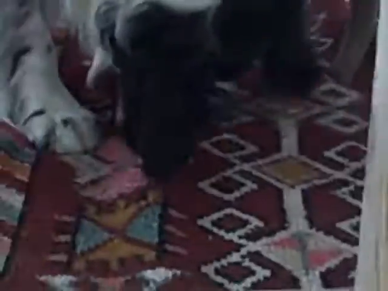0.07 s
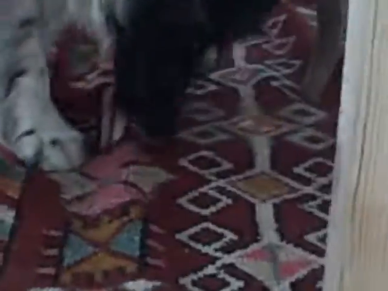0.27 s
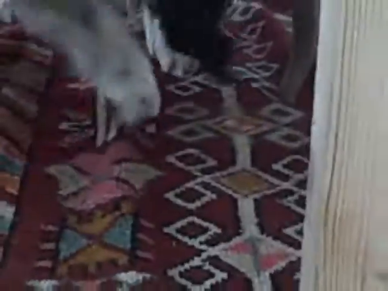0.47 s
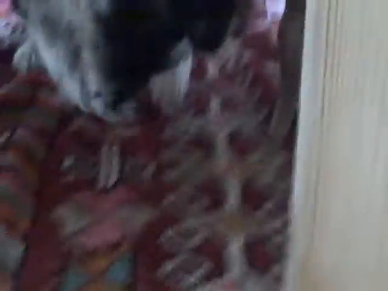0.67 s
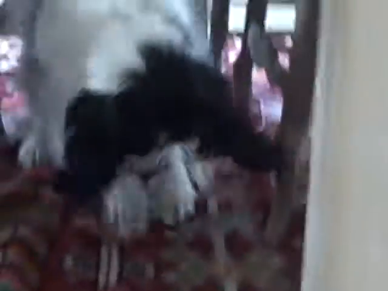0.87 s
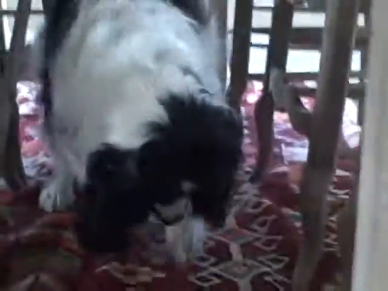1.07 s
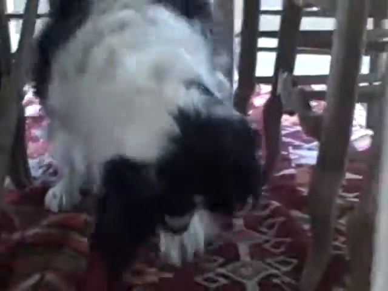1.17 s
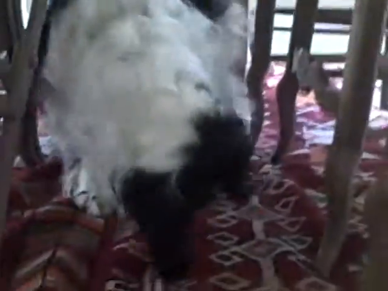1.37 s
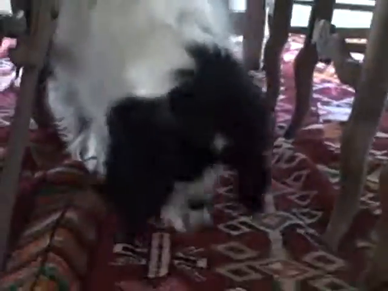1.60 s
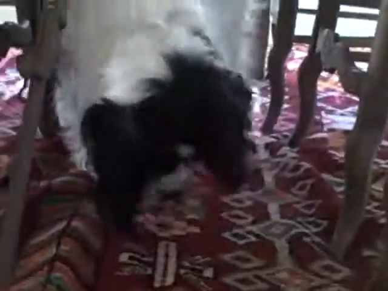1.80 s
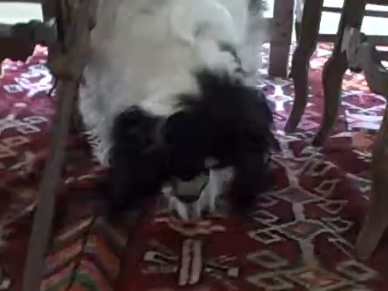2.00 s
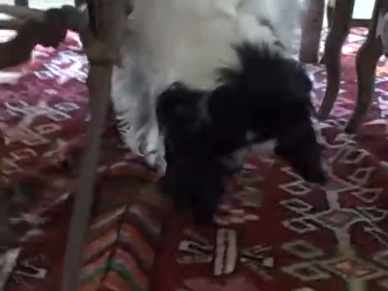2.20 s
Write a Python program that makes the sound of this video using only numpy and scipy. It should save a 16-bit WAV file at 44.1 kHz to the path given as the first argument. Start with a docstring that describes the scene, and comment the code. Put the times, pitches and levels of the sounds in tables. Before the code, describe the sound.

A puppy digs at a woven rug on a wooden floor, heard close in a small quiet room with faint low hum. A short, dull knocking scrape comes at 0.1 seconds. From 0.5 to 1.4 quick strokes run nearly together, claws ticking and crackling through threads, boards knocking and thudding beneath. After a brief gap, another stroke scrapes around 1.65 to 1.8, then a short, softer one at 2.05.

```python
"""First a faint low room hum is heard, then a puppy digs at a woven rug on a wooden floor in a quiet room.
In each stroke the claws catch threads: short noise bursts make sharp ticks, and decaying sines make the
boards below knock. Between them random clicks make small fibres crackle and the boards rumble,
and high hiss makes the pads rasp. Low noise makes the floor boom under the puppy's weight.
Feedback delays add the room's echo to the digging."""
import sys
import numpy as np
from scipy import signal
from scipy.fft import rfft, irfft
from scipy.io import wavfile

SR = 44100
rng = np.random.default_rng(int(sys.argv[2]) if len(sys.argv) > 2 else 0)


def bounce(signal):
    """Save signal as a 16-bit WAV file at the path given by the first command-line argument."""
    frames = np.transpose(np.atleast_2d(signal))
    limited = np.clip(frames, -1, 1)
    pcm = np.round(limited * 32767).astype(np.int16)
    wavfile.write(sys.argv[1], SR, pcm)


N = 99225  # length in samples

# Claws catching a thread; each layer adds its own gain to these levels.
# Columns: start_s [s], tick_db [dB], knock_db [dB], bright_db (treble of the tick) [dB]
CLAW_SNAGS = [(0.1214, -26, -24.5, -13), (0.1384, -34.5, -16.5, 2), (0.146, -39, -31, -2.0),
              (0.1566, -28, -23.5, -6), (0.1683, -40, -23, -6.0), (0.1752, -40, -20.5, 0),
              (0.186, -42, -23.0, -1.0), (0.1933, -74, -22, -4.0), (0.471, -43.5, -51, 9),
              (0.5225, -36, -35.5, -3), (0.5521, -27.5, -33.5, -9), (0.5697, -39.0, -34, 4),
              (0.5761, -41, -31, 4), (0.5887, -24.5, -26.5, -10), (0.602, -35, -38, -6),
              (0.6065, -21.5, -22.5, -14), (0.6303, -25, -29, 2), (0.654, -19.5, -30, -7),
              (0.6589, -26, -24, -3), (0.6703, -17, -40, 2), (0.6748, -18.5, -19.5, 1),
              (0.6859, -17.5, -30, -1), (0.6952, -24, -29, 5), (0.7078, -19, -25, -3),
              (0.7213, -20.5, -34, 3), (0.727, -23.5, -34, -7), (0.7373, -41, -18.5, 2),
              (0.7482, -31.0, -25.5, -8.0), (0.7543, -31, -24.0, -3), (0.8985, -40, -28.5, 3),
              (0.9053, -27.5, -31, 0.0), (0.916, -26, -30.5, 3), (0.9272, -23.5, -25.5, -7),
              (0.9308, -19, -32, -9), (0.9472, -18.5, -23.0, 5), (0.9502, -27, -29, 3.0),
              (0.9609, -34, -22.5, -1.0), (0.9666, -25.5, -24, -8), (0.9755, -19.5, -27, -4.0),
              (0.9872, -31, -27.5, -8.0), (1.0189, -29, -25, -8), (1.048, -21.5, -45, -10),
              (1.055, -21.5, -26.0, -16), (1.0644, -21, -34, -5), (1.0764, -19, -27.5, -19),
              (1.0836, -16, -23, -17), (1.0876, -21.5, -31, 0), (1.0943, -23.5, -29, -1),
              (1.1059, -24.0, -33, -11), (1.1112, -21.5, -22.5, -7.0), (1.1302, -39, -26.0, -11),
              (1.205, -19.5, -25, 0), (1.225, -17, -21, 7.5), (1.2418, -17, -28.5, 3),
              (1.2483, -28, -29, -9), (1.2577, -23.5, -30, -4), (1.266, -25, -22, 4),
              (1.2696, -21, -35, -19), (1.281, -34, -24, -6.0), (1.2902, -25, -23, -19),
              (1.3006, -20.5, -35, -4), (1.3152, -25.5, -23, -2.0), (1.339, -48, -26.5, -7.0),
              (1.348, -27, -30, -18), (1.3583, -28, -28, -24), (1.37, -41, -23.5, -6),
              (1.5542, -53, -49, -12.0), (1.584, -55.0, -38, -1.0), (1.6518, -35.5, -27, 8),
              (1.6606, -23.5, -27, -2), (1.6709, -42, -27, -1), (1.6799, -21.5, -28.5, -11),
              (1.6902, -25.5, -26, -9), (1.7009, -18, -16.5, -18), (1.7144, -19.5, -31.5, -16),
              (1.727, -29, -27, -3), (1.7357, -31, -19, -4.0), (1.7432, -46, -19, -6.0),
              (1.751, -45, -20, 4), (1.7607, -31.5, -24, -10), (1.8029, -30, -29.5, -3),
              (2.052, -56, -23, 2), (2.0651, -38, -22, -7), (2.0714, -29.5, -22.5, 10),
              (2.0954, -33, -30, 2), (2.108, -58, -26.5, 1), (2.1172, -46, -27, -3.0)]


def from_db(db):
    """Turn decibels into a gain."""
    return 10 ** (np.asarray(db) / 20)


def rms_one(x):
    """Scale a sound to an rms (average strength) of 1."""
    return x / np.sqrt(np.mean(x ** 2) + 1e-20)


def stroke_gain(column):
    """Loudness curve from one column of the strokes, silent between them."""
    # One list of points per digging stroke, or per part of a long stroke; the layers add their own gains.
    # Columns: start_s [s], low_rumble_db [dB], upper_rumble_db [dB], crackle_db [dB], rasp_db [dB]
    stroke_tables = [
        [(0.12, -39, -36, -49, -72), (0.136, -29, -43, -60, -72), (0.166, -25, -63.5, -52, -86),
         (0.204, -29.5, -41.5, -59, -68.5), (0.22, -45, -45, -59, -78)],
        [(0.46, -70, -81, -73, -81), (0.5, -54.5, -56, -63, -65), (0.608, -37, -38, -47.5, -63),
         (0.624, -42, -56, -53.5, -60), (0.66, -37, -42, -43, -62)],
        [(0.66, -34.5, -46.5, -44.5, -64), (0.736, -27.5, -45.5, -42.5, -60), (0.838, -53.5, -57, -71, -70),
         (0.888, -50, -72, -66, -68), (0.893, -47.5, -53, -63, -69)],
        [(0.893, -51, -55, -52, -64), (0.903, -37, -41, -49, -55), (0.955, -29, -26.5, -44, -50),
         (0.983, -36.5, -45, -49, -59), (1.008, -25.5, -52, -57, -60)],
        [(1.008, -38, -47, -53, -62), (1.016, -37.5, -44, -46.5, -58), (1.09, -32.5, -35.5, -44, -65),
         (1.136, -33, -43, -59, -65), (1.19, -51, -61, -61, -73)],
        [(1.19, -46, -55, -56, -65), (1.202, -35, -41.5, -51, -60), (1.266, -36.5, -36.5, -52.5, -55),
         (1.378, -38.5, -45, -59, -71), (1.41, -48, -76, -73, -63)],
        [(1.545, -62, -65, -78, -74), (1.553, -49, -52, -60.5, -73), (1.589, -45, -61, -77, -64),
         (1.627, -64, -82, -75, -74), (1.648, -46, -57, -56, -61)],
        [(1.648, -49, -33, -57, -62), (1.662, -25, -44.5, -52, -50), (1.73, -30, -33, -47.5, -61),
         (1.812, -47, -61, -68, -74), (1.82, -48, -65, -76, -74)],
        [(2.047, -35, -37, -58, -61), (2.071, -29.5, -42, -51.5, -54), (2.111, -34.5, -41, -52, -61),
         (2.143, -53, -62, -80, -73), (2.15, -49, -56, -71, -63)],
    ]
    t = np.arange(N) / SR
    gain = np.zeros(N)
    for rows in stroke_tables:
        rows = np.array(rows)
        start_s, end_s = rows[0, 0], rows[-1, 0]
        fade = np.clip(np.minimum(t - start_s, end_s - t) / .003, 0, 1)  # 3 ms in and out
        gain += fade * from_db(np.interp(t, rows[:, 0], rows[:, column]))
    return gain


def band(x, low_hz, high_hz):
    """Keep only the sound between two pitches."""
    sos = signal.butter(2, [low_hz, high_hz], "band", fs=SR, output="sos")
    return signal.sosfilt(sos, x + 1e-18)  # the tiny offset avoids very slow near-zero sums


def colour(x, spectrum):
    """Filter a sound to follow a spectrum, with the filter's energy as early as possible."""
    hz, db = np.transpose(spectrum)
    grid_hz = np.linspace(1, SR / 2, 2049)
    gain = from_db(np.interp(np.log(grid_hz), np.log(hz), db))
    # folding the cepstrum (spectrum of the log gain) forward gives minimum phase
    cepstrum = irfft(np.log(gain))
    cepstrum[1:2048] *= 2
    cepstrum[2049:] = 0
    response = irfft(np.exp(rfft(cepstrum)))
    return signal.fftconvolve(x, response)[:len(x)]


def grains(per_s, spread_db):
    """Random clicks of either sign; a larger spread makes their sizes more uneven. The rms is 1."""
    size = from_db(spread_db * np.minimum(rng.exponential(1, N), 5))
    sign = rng.choice([-1, 1], N)
    happens = rng.random(N) < per_s / SR
    return rms_one(size * sign * happens)


def ring(clicks, hz, t60_s):
    """A click sets a sine ringing, which falls by 60 dB in t60_s; a unit click starts it at height 1."""
    shrink = from_db(-60 / (t60_s * SR))  # per sample
    turn = 2 * np.pi * hz / SR
    return signal.lfilter([0, np.sin(turn)], [1, -2 * shrink * np.cos(turn), shrink ** 2], clicks + 1e-18)


def air():
    """The room's faint hum is steady noise, strongest in the bass."""
    # Colour of the room hum; only its shape matters. Columns: pitch_hz [Hz], level_db [dB]
    air_colour = [(30, 0.5), (60, 4), (120, -7.5), (220, -11), (900, -17.5), (2200, -25.5), (6000, -36),
                  (16000, -44)]
    return from_db(-51) * rms_one(colour(rng.standard_normal(N), air_colour))


def room(x):
    """Sound bouncing between the walls: ten feedback delays, duller on every round."""
    room_t60_s, wall_cut_hz = 0.44, 1780
    out = np.zeros(N)
    dull = np.exp(-2 * np.pi * wall_cut_hz / SR)
    lags = (rng.uniform(.011, .04, size=10) * SR).astype(int)
    for k, lag in enumerate(lags):
        loop = x.copy()
        gain = from_db(-60 * lag / SR / room_t60_s)
        state = [0.]
        for i in range(lag, N, lag):
            back, state = signal.lfilter([gain * (1 - dull)], [1, -dull], loop[i - lag:i], zi=state)
            loop[i:i + lag] += back[:N - i]
        out += (loop - x) * (-1) ** k  # echoes only, with alternating sign
    return out


def boom():
    """Shifting weight sounds the floor's lowest mode, held fairly steady, with broader thudding above it."""
    # The puppy's weight shifting on the floor. Columns: start_s [s], boom_db [dB], thud_db [dB]
    weight_shifts = [(0.0, -58, -65), (0.06, -68, -70), (0.17, -55, -35.5), (0.22, -40, -44.5),
                     (0.4, -66, -74.5), (0.46, -52, -65), (0.59, -64, -42), (0.63, -44, -42),
                     (0.76, -53, -47), (0.88, -39, -64.5), (0.92, -55, -41.5), (1.0, -44, -38),
                     (1.4, -48, -48), (1.42, -57, -54), (1.53, -50, -61.5), (1.67, -54, -46),
                     (1.77, -42, -39), (1.89, -57, -59.5), (2.04, -64, -60), (2.1, -56, -37.5),
                     (2.19, -51, -54), (2.25, -72, -60)]
    boom_hz, boom_width_hz, boom_even = 56, 12, 0.96  # an evenness of 0 leaves all the swelling in
    thud_low_hz, thud_top_hz = 83, 204
    s, boom_db, thud_db = np.transpose(weight_shifts)
    t = np.arange(N) / SR
    low = rms_one(band(rng.standard_normal(N), boom_hz - boom_width_hz / 2, boom_hz + boom_width_hz / 2))
    swell = np.abs(signal.hilbert(low))
    low = rms_one(low / (swell + .3) ** boom_even)
    thud = rms_one(band(rng.standard_normal(N), thud_low_hz, thud_top_hz))
    return from_db(np.interp(t, s, boom_db)) * low + from_db(np.interp(t, s, thud_db)) * thud


def rasp():
    """Pads and fur brush the pile: a high flickering hiss that puffs up at each snag."""
    rasp_low_hz, rasp_flicker_db, rasp_db = 6950, 2.5, -5.5
    puff_db, puff_s, linger_s = -33.5, 0.0022, 0.011
    s, tick_db, _, bright_db = np.transpose(CLAW_SNAGS)
    hiss = rms_one(band(rng.standard_normal(N), rasp_low_hz, .47 * SR))
    flicker = rms_one(band(rng.standard_normal(N), 22, 130))
    # the brushing level follows the strokes with a lag
    linger = np.exp(-1 / (linger_s * SR))
    brush = signal.lfilter([1 - linger], [1, -linger], stroke_gain(column=4))
    brush = from_db(rasp_db + rasp_flicker_db * flicker) * brush
    # each snag starts a puff that dies away
    puffs = np.zeros(N)
    puffs[(s * SR).astype(int)] = from_db(tick_db + bright_db + puff_db)
    fall = np.exp(-1 / (puff_s * SR))
    puffs = signal.lfilter([1], [1, -fall], puffs + 1e-18)
    return (brush + puffs) * hiss


def boards():
    """Snags knock every mode (way of ringing) of rug and boards; the dragging paw keeps them rumbling."""
    # How rug and boards ring. Columns: pitch_hz [Hz], level_db [dB], t60_s (time to fall 60 dB) [s]
    board_modes = [(230.4, -10.5, 0.043), (328.6, -2.5, 0.031), (381.3, 0.5, 0.034), (449.8, -1.5, 0.043),
                   (551, -11.5, 0.044), (614.3, -7.5, 0.065), (704, -12, 0.067), (909, 0, 0.014),
                   (1164, -10, 0.025), (1296, -14.5, 0.045)]
    knock_gain_db, knock_spread_db = -9, 2.0
    knock_low_hz, knock_soft_hz = 146, 1580
    hard_tilt = 0.26  # dB per octave for each dB that the tick is weaker than the knock
    upper_from_hz, upper_db, rub_db = 520, 5, -7
    s, tick_db, knock_db, _ = np.transpose(CLAW_SNAGS)
    places = (s * SR).astype(int)
    softness_db = np.minimum(tick_db - knock_db, 0)
    rubs = grains(per_s=400, spread_db=0)
    knock, low_rumble, upper_rumble = np.zeros(N), np.zeros(N), np.zeros(N)
    for k, (hz, level_db, t60_s) in enumerate(board_modes):
        octaves = max(np.log2(hz / upper_from_hz), 0)
        spread_db = knock_spread_db * rng.standard_normal(len(s))
        # softer snags excite the upper modes less
        tilt_db = octaves * hard_tilt * softness_db
        clicks = np.zeros(N)
        clicks[places] = from_db(knock_db + knock_gain_db + level_db + spread_db + tilt_db)
        knock += (-1) ** ((k + 2) // 3) * ring(clicks, hz, t60_s)
        rubbed = (-1) ** k * from_db(level_db) * ring(rubs, hz, t60_s)
        if octaves > 0:
            upper_rumble += rubbed
        else:
            low_rumble += rubbed
    drag = stroke_gain(column=1) * rms_one(low_rumble)
    drag += from_db(upper_db) * stroke_gain(column=2) * rms_one(upper_rumble)
    return band(knock + from_db(rub_db) * drag, knock_low_hz, knock_soft_hz)


def threads():
    """A caught thread lets go with a snap and a few milliseconds of fray; fibres crackle in each stroke."""
    # Colour of thread ticks and crackle; only its shape matters. Columns: pitch_hz [Hz], level_db [dB per Hz]
    thread_colour = [(300, -30), (700, 10.5), (1200, 5), (2300, 3.5), (3500, -2), (5000, -5.5),
                     (7500, -14.5), (11000, -13), (15000, -10)]
    tick_t60_s, tick_gain_db, snap_db = 0.0077, -3.5, 13
    tick_split_hz, tick_top_hz = 1070, 7500
    crackles_per_s, crackle_spread_db, crackle_gain_db = 4100, 3.5, 1
    t = np.arange(int(.015 * SR)) / SR
    top = signal.butter(2, tick_top_hz, fs=SR)
    split = signal.butter(1, tick_split_hz, fs=SR)
    ticks = np.zeros(N + len(t))
    for s, tick_db, _, bright_db in CLAW_SNAGS:
        burst = rng.standard_normal(len(t)) * from_db(-60 * t / tick_t60_s)  # the fray
        burst[0] = -from_db(snap_db)  # the snap
        burst = signal.lfilter(*top, colour(burst, thread_colour))
        # the snag's brightness sets the treble above the split
        dull = signal.lfilter(*split, burst)
        burst = dull + from_db(bright_db) * (burst - dull)
        start = int(s * SR)
        ticks[start:start + len(t)] += from_db(tick_db + tick_gain_db) * burst / np.abs(burst).max()
    crackle = rms_one(colour(grains(crackles_per_s, crackle_spread_db), thread_colour))
    return ticks[:N] + from_db(crackle_gain_db) * stroke_gain(column=3) * crackle


def scene():
    """Digging, its echo, the floor boom and the room hum, as one channel."""
    dig = boards() + threads() + rasp()
    echo = from_db(-15) * room(dig)
    return (dig + echo + boom() + air())[None]


def record(dry):
    """The microphone drops the deepest bass; the top is cut steeply."""
    mic_low_hz, cutoff_hz = 42.5, 16100
    dry = signal.sosfilt(signal.butter(2, mic_low_hz, "high", fs=SR, output="sos"), dry)
    return signal.sosfilt(signal.cheby2(14, 60, cutoff_hz, fs=SR, output="sos"), dry)


dry = scene()
out = record(dry)
bounce(out)
```